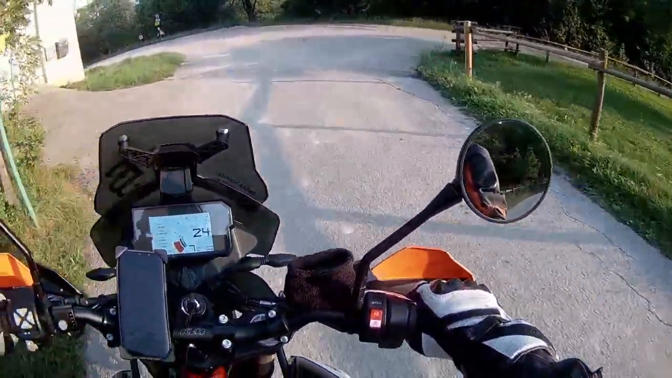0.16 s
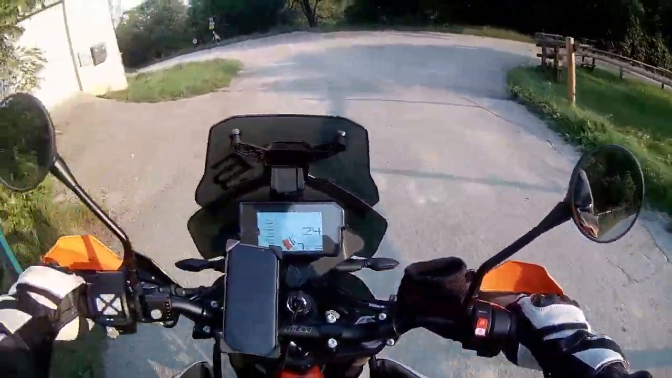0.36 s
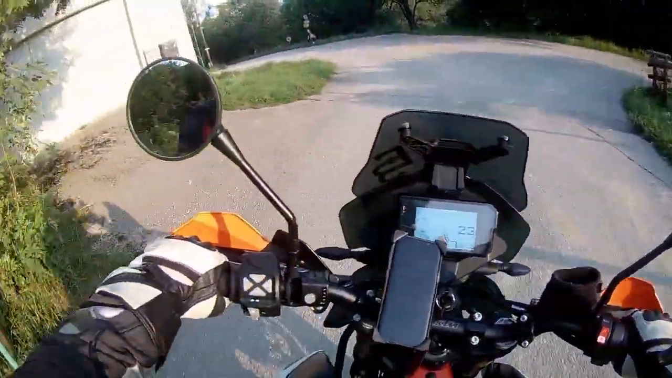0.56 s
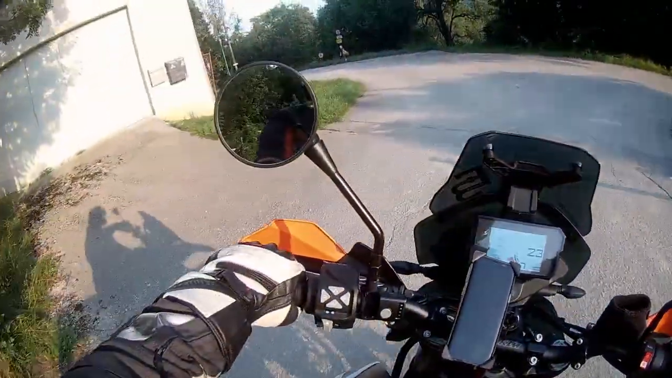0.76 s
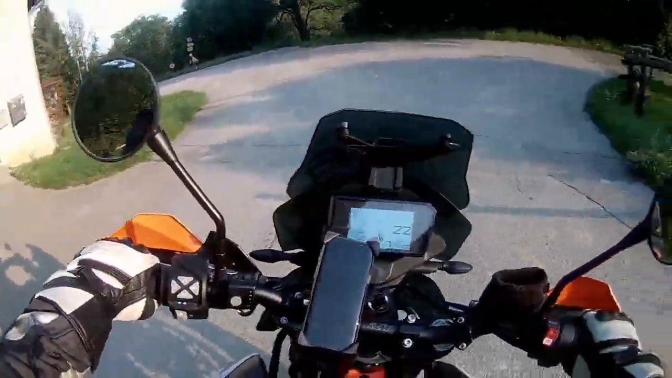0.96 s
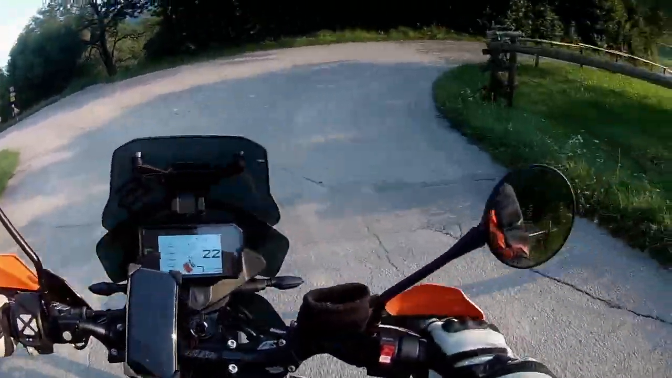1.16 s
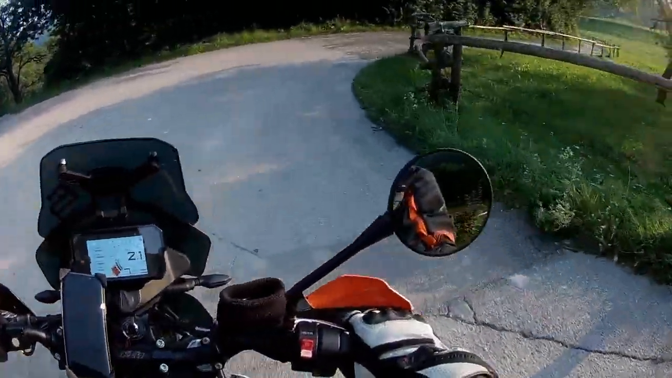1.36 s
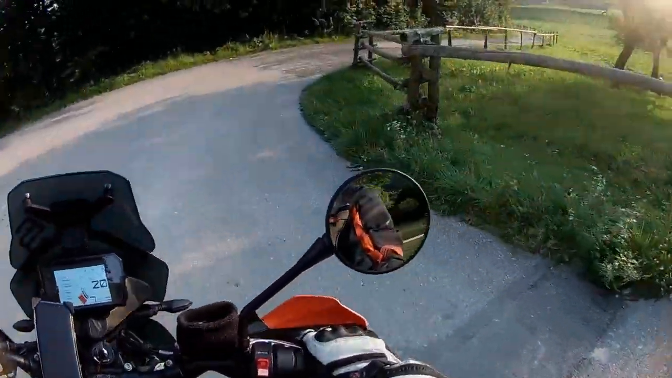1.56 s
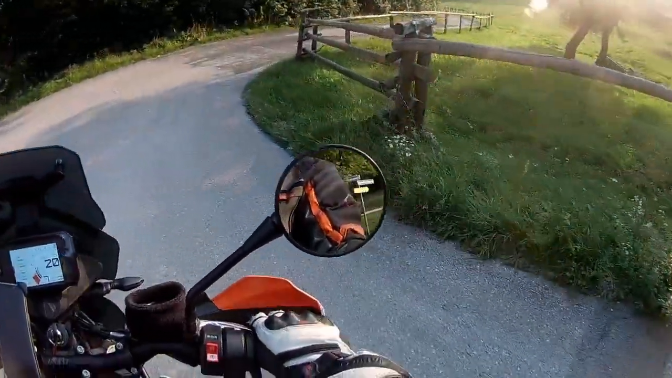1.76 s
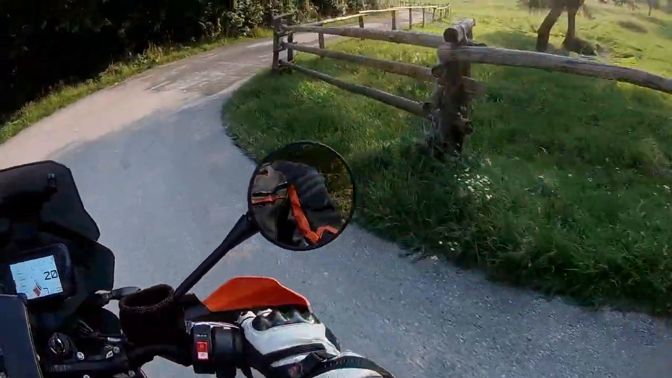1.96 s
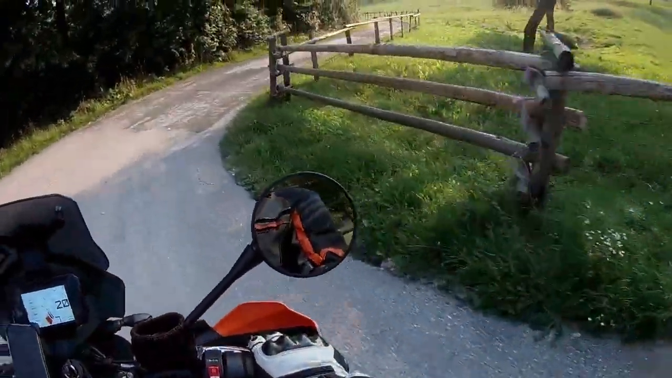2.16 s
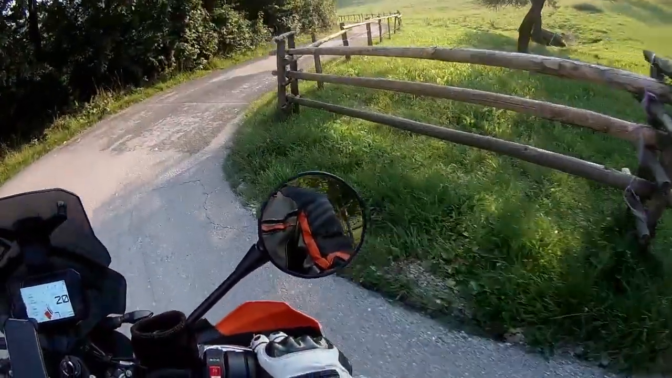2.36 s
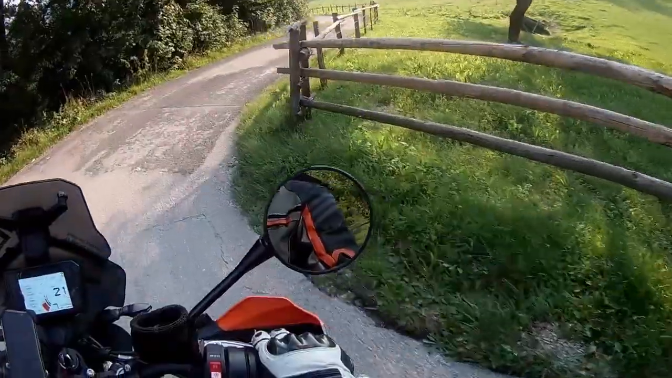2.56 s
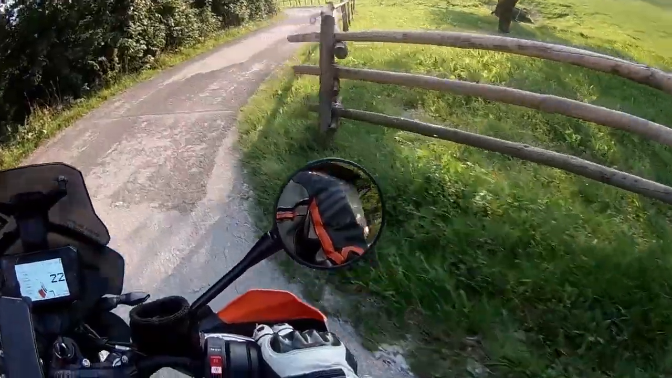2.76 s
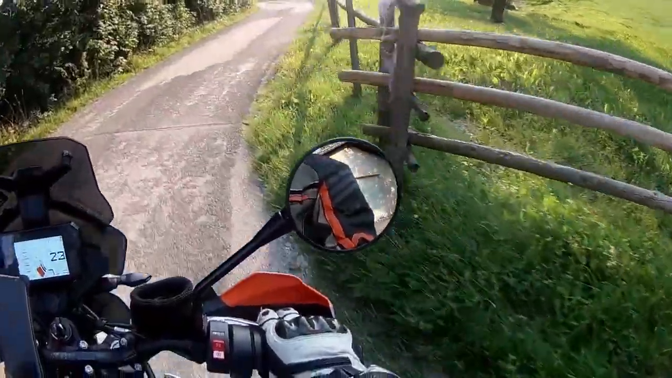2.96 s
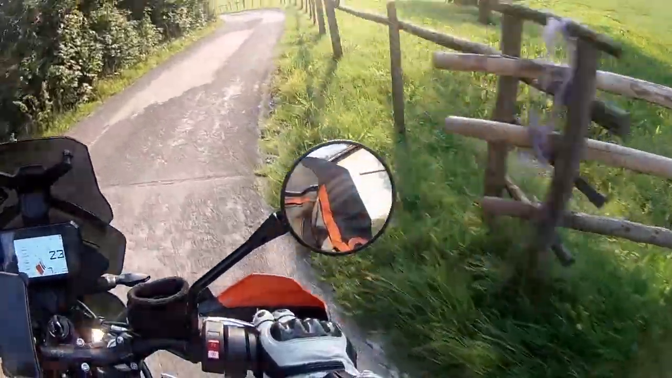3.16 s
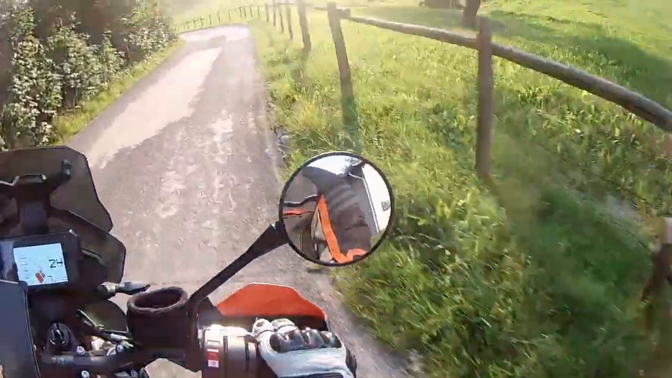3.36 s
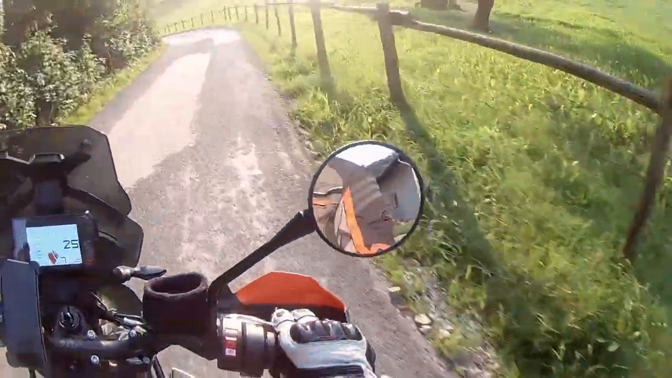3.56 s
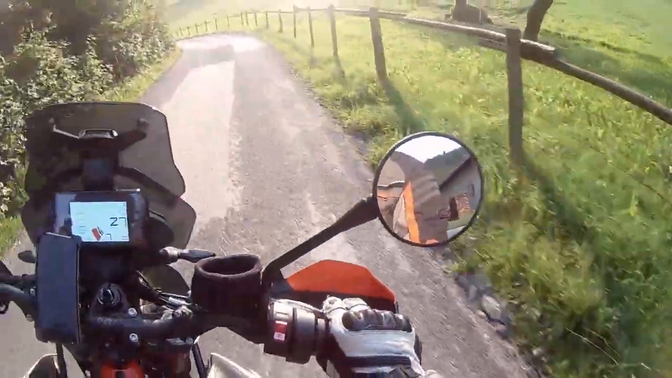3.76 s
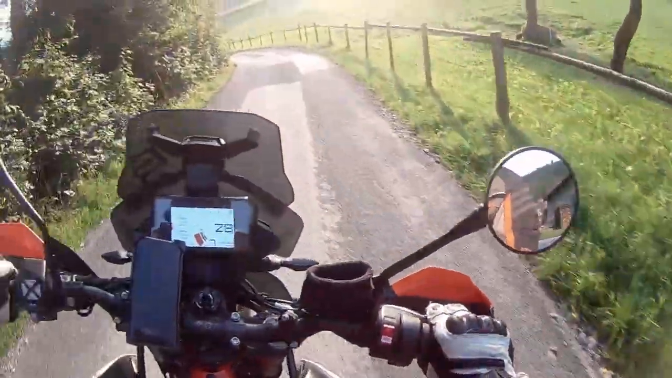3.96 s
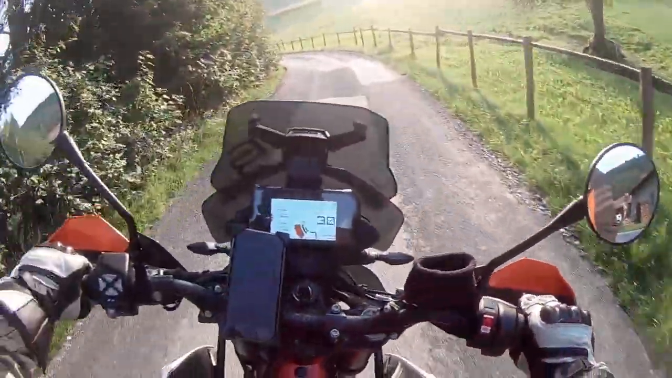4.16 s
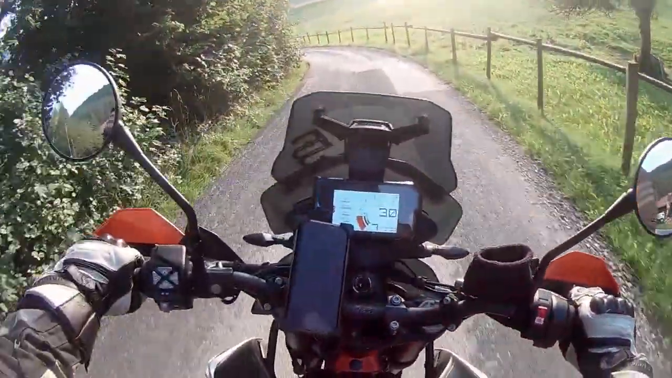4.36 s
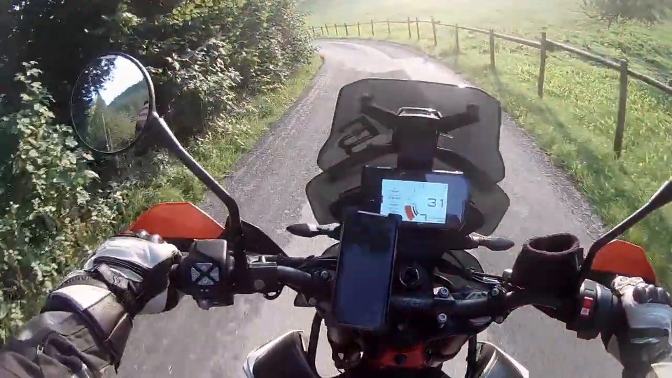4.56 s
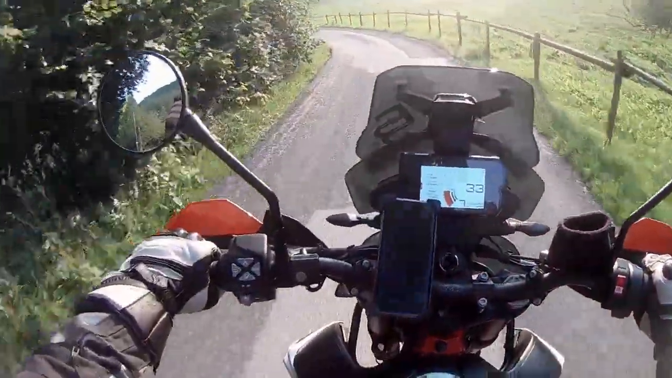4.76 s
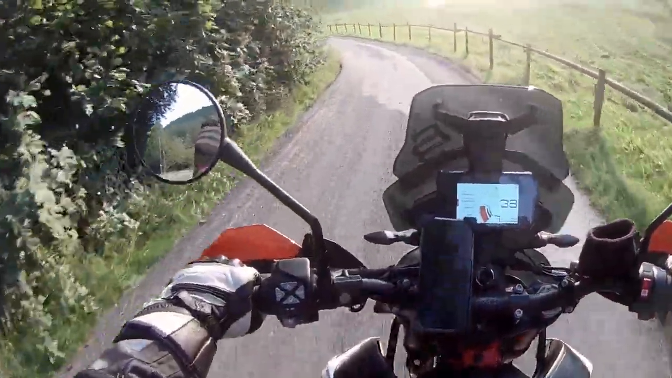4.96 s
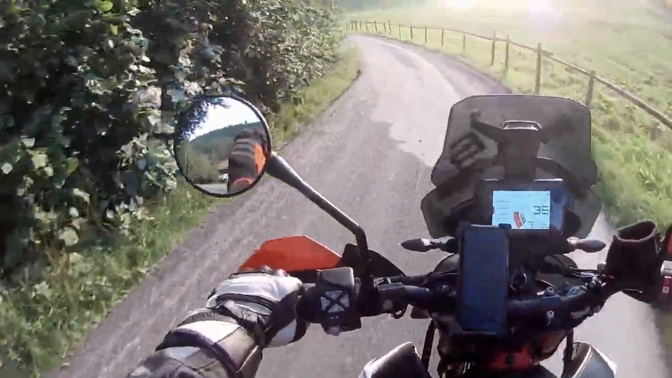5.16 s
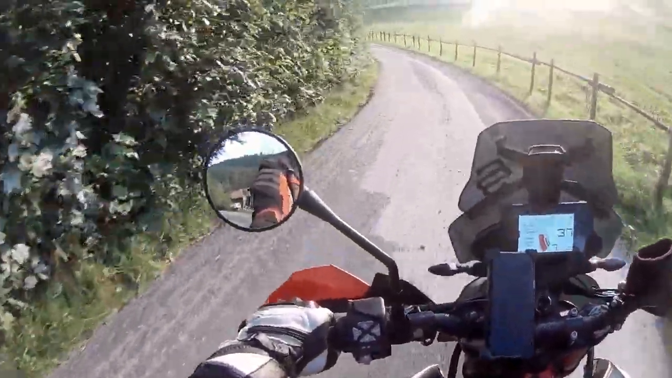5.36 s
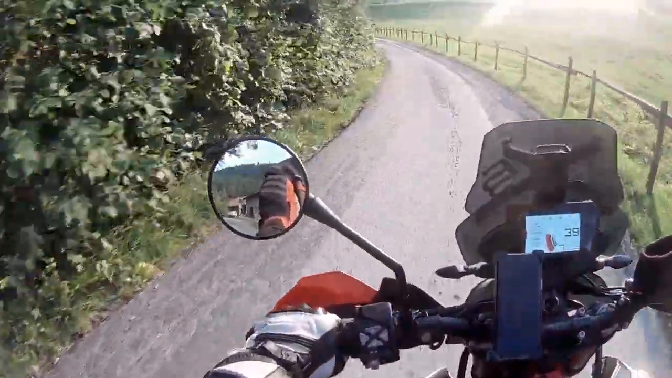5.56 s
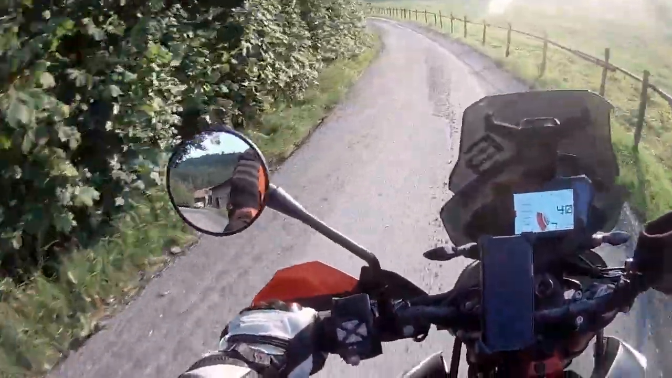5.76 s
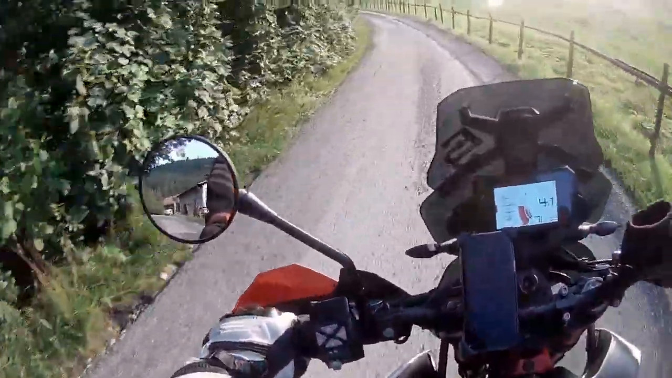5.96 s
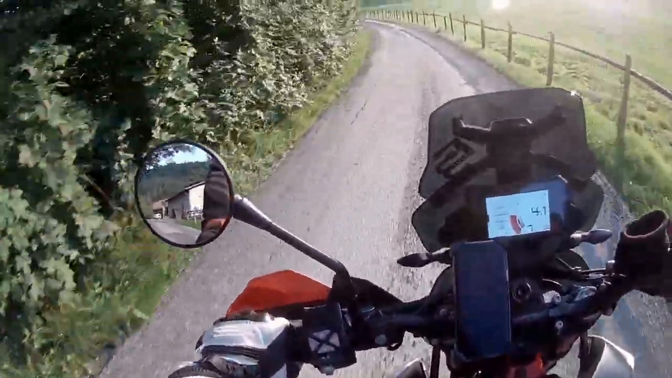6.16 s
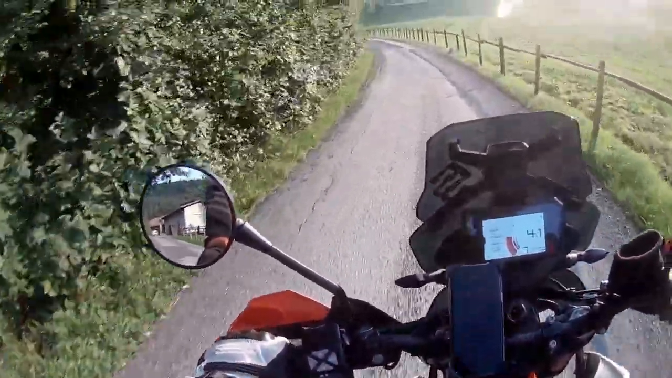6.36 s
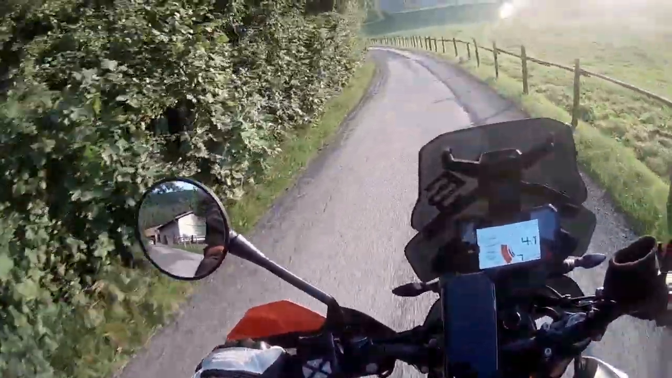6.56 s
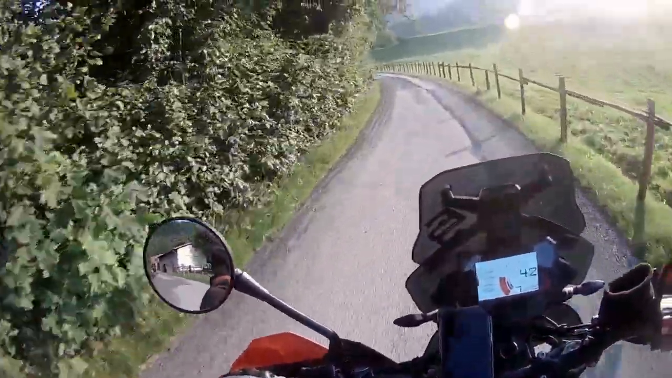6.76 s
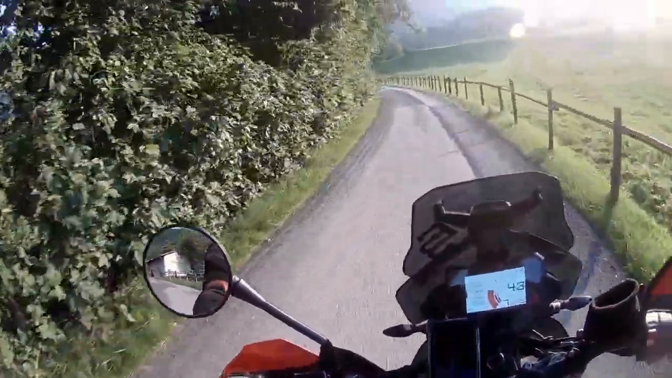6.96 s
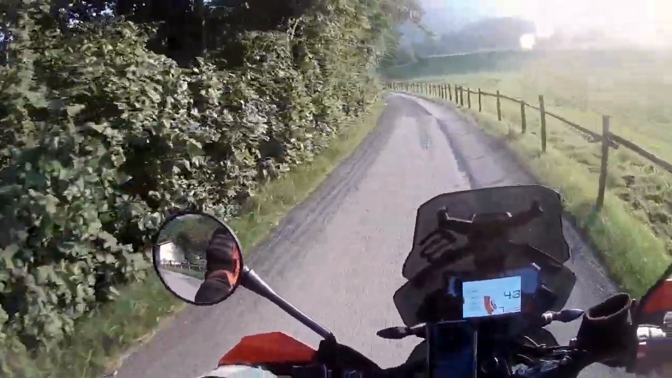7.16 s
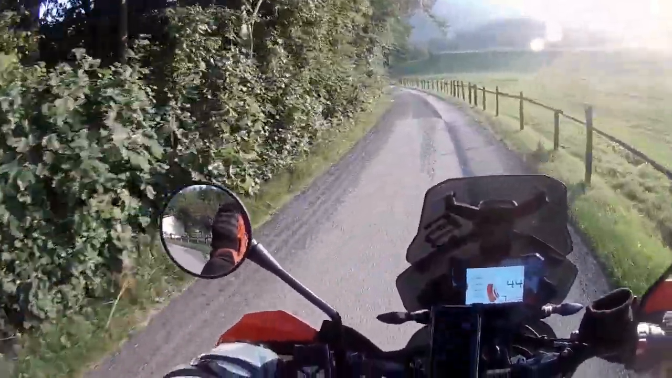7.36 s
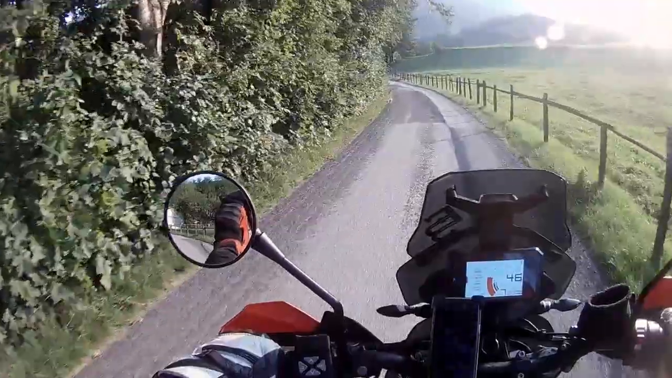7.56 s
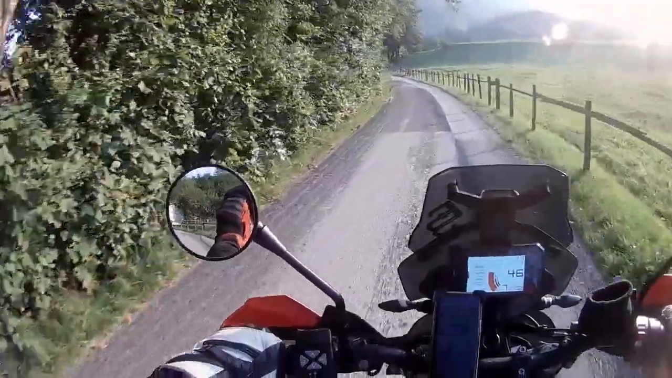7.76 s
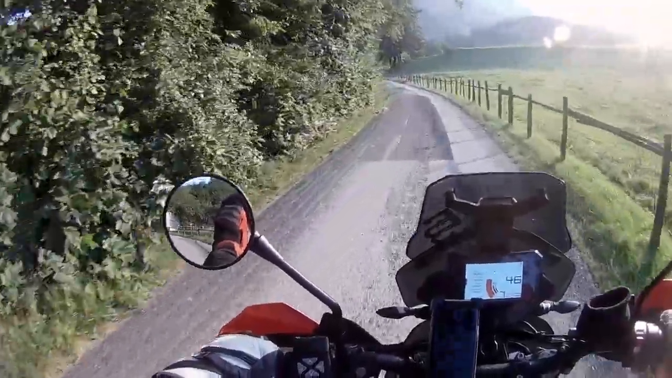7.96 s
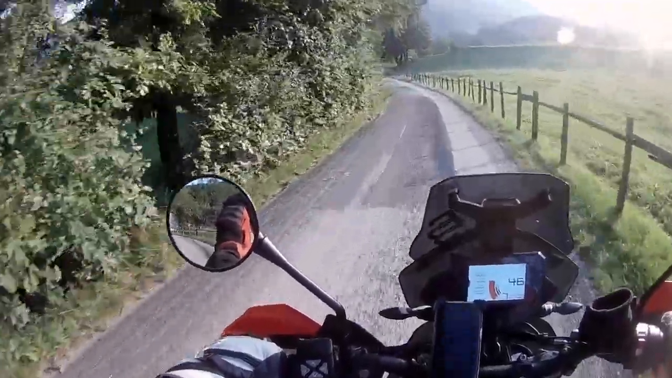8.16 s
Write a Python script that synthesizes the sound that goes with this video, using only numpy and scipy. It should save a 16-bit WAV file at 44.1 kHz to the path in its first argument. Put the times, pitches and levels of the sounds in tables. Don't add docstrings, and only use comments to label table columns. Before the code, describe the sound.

Outdoors, a muffled housed microphone on the rider picks up a lumpy twin engine dropping in speed, clattering and softly whining. After the bend it pulls hard, deep beats quickening into a rising growl. The throttle wavers, then closes; heavy wind thuds, hollow airy rushing and a smooth tread hum take over, with tiny instants of missing treble.

```python
import sys
import numpy as np
from scipy import signal
from scipy.fft import rfft, irfft, next_fast_len
from scipy.io import wavfile

SR = 44100
rng = np.random.default_rng(int(sys.argv[2]) if len(sys.argv) > 2 else 0)


def wav_record(signal):
    frames = np.transpose(np.atleast_2d(signal))
    bounded = np.clip(frames, -1, 1)
    quanta = np.round(bounded * 32767).astype(np.int16)
    wavfile.write(sys.argv[1], SR, quanta)


def ratio(d):
    e = np.asarray(d, float) / 20
    return 10 ** e


N = 366030
STEP = 40


def rms_one(x):
    return x / np.sqrt(np.mean(x ** 2) + 1e-20)


def in_time(rows):
    s, *columns = np.transpose(rows)
    return [np.interp(np.arange(N) / SR, s, c) for c in columns]


def smooth(coarse):
    return np.interp(np.arange(N) / STEP, np.arange(len(coarse)), coarse)


def drift(rate_hz):
    r = np.exp(-2 * np.pi * STEP * rate_hz / SR)
    white = rng.standard_normal(N // STEP + 2001)
    slow = signal.lfilter([1], [1, -2 * r, r * r], white)[2000:]
    return rms_one(slow - slow.mean())


def swells(events, size):
    t = np.arange(N // STEP + 1) * STEP / SR
    return smooth(sum(size(db) * np.exp(-((t - s) / half_s) ** 2) for s, db, half_s in events))


def resonance(x, hz, width_hz):
    r = np.exp(-np.pi * width_hz / SR)
    zeros = (1 - r * r) / 2 * np.array([1, 0, -1])
    poles = [1, -2 * r * np.cos(2 * np.pi * hz / SR), r * r]
    return signal.lfilter(zeros, poles, x + 1e-18)


def steep_resonance(x, hz, width_hz):
    return resonance(resonance(x, hz, width_hz), hz, width_hz)


def coloured(spectrum):
    hz, level_db = np.transpose(spectrum)
    size = next_fast_len(N)
    log_hz = np.log(np.arange(size // 2 + 1) * SR / size + 1e-3)
    gain = ratio(np.interp(log_hz, np.log(hz), level_db))
    return rms_one(irfft(rfft(rng.standard_normal(size)) * gain, size)[:N])


def ringing_noise(modes, gate, patchy_db):
    white = gate * rng.standard_normal((2, N))
    out = 0
    for k, (hz, width_hz, db) in enumerate(modes):
        level = smooth(ratio(db + patchy_db * drift(11.0)))
        out = out + level * steep_resonance(white[k % 2], hz, 1.55 * width_hz)
    return rms_one(out)


def smeared(turns, smear_hz, clean):
    low_pass = signal.butter(2, smear_hz / 2, fs=SR, output="sos")
    blur = signal.sosfilt(low_pass, rng.standard_normal((2, N)))
    flutter = clean + rms_one(blur[0]) + 1j * rms_one(blur[1])
    return rms_one(np.real(flutter * np.exp(2j * np.pi * turns)))


MID_SPEED_PER_S, FULL_LOAD_DB = 20, -26
# (time [s], four-stroke cycles [1/s], firing strength [dB])
CRANK = [(0, 16.7, -36), (.55, 15.9, -34), (1.0, 15.3, -38), (1.5, 14.5, -41), (2.0, 14.1, -38),
         (2.3, 14.4, -35), (2.6, 15.0, -31), (3.0, 16.2, -26.5), (3.5, 17.75, -25.5), (4.0, 20.05, -25.5),
         (4.5, 22.75, -26), (5.2, 26.7, -25.5), (5.4, 27.6, -28), (5.6, 28.0, -34), (6.0, 28.5, -29),
         (6.4, 29.1, -31), (6.8, 30.0, -39), (8.3, 32.7, -50)]


def speed_and_load():
    per_s, strength_db = in_time(CRANK)
    return per_s, 20 * np.log10(per_s / MID_SPEED_PER_S), strength_db - FULL_LOAD_DB


# (frequency [Hz], density [dB per Hz])
HISS = [(4410, -35), (7500, -5), (10600, -6.5), (15100, -4), (15700, -2.5)]


def hiss():
    return ratio(-61) * coloured(HISS)


# (frequency [Hz], density [dB per Hz])
ROAR = [(120, -13.5), (220, -0.5), (280, -3), (330, -5), (550, -3), (700, -7), (860, -13), (1000, -7.5),
        (2500, -21.5), (7500, -51)]
ROAR_DB, ROAR_DB_PER_SPEED_DB = -37, 1.79


def roar(speed_db):
    level_db = ROAR_DB + ROAR_DB_PER_SPEED_DB * speed_db + 0.4 * smooth(drift(12.0))
    return coloured(ROAR) * ratio(level_db)


# (time [s], level [dB])
AIRFLOW = [(0, -32.5), (.78, -34.5), (1.2, -32), (1.6, -35.5), (1.95, -38), (3.0, -38), (3.6, -32.5),
           (3.9, -30.5), (4.5, -26.5), (5.5, -28), (6.15, -24.5), (6.45, -24.5), (7.0, -23.5), (8.0, -23.5),
           (8.3, -23.5)]
# (frequency [Hz], width [Hz], level [dB])
HOUSING = [(1137, 153, -4), (1412, 150, -1.5), (1537, 58, 3), (1733, 72, -4), (2003, 253, -9.5),
           (2173, 110, -18), (2840, 380, -18.5), (3640, 230, -25), (3998, 90, -19), (4565, 300, -28.5),
           (5960, 230, -30.5), (6970, 200, -39)]


def rush():
    rush_db, = in_time(AIRFLOW)
    turbulence = smooth(ratio(0.96 * drift(37)))
    return ratio(rush_db - 0.6) * ringing_noise(HOUSING, turbulence, patchy_db=0.3)


# (time [s], level [dB], half length [s])
BUMPS = [(.44, -35.5, 0.081), (.7, -34, 0.063), (1.27, -24, 0.2), (2.14, -22, 0.13), (3.55, -29, .07),
         (3.92, -17, 0.17), (4.7, -25, 0.12), (5.2, -18, 0.06), (5.55, -14, 0.1), (5.83, -14, 0.076),
         (6.2, -14.5, 0.078), (6.55, -20, .1), (6.84, -29, 0.042), (6.96, -21, 0.044), (7.55, -26, 0.087),
         (7.71, -26, .05), (7.95, -11, 0.064), (8.21, -27, .04)]
IDLE_SHAKE_DB, SHAKE_HZ, SHAKE_WIDTH_HZ = -37.5, 26.3, 6.3


def shake():
    swing = smeared(SHAKE_HZ * np.arange(N) / SR, SHAKE_WIDTH_HZ, clean=1.5)
    return ratio(-6.5) * (ratio(IDLE_SHAKE_DB) + swells(BUMPS, size=ratio)) * swing


# (time [s], change [dB], half length [s])
GUSTS = [(0.0, 5.5, 0.055), (.46, -1, 0.046), (.67, 7, 0.041), (.8, -1, .1), (1.3, 1.5, .08),
         (1.85, 7.5, 0.28), (2.2, 5, 0.1), (3.2, 0, 0.14), (4.79, 1, .08), (5.26, 1, 0.044),
         (5.55, 3.5, 0.19), (6.27, 2.5, .06), (6.01, 4, 0.047), (6.15, 2.5, 0.051), (6.7, 1, 0.039),
         (6.89, 2, 0.044), (7.12, -6, 0.052), (7.42, -6.5, 0.038), (7.49, 2.5, 0.026), (7.65, 3.5, 0.084),
         (7.79, 2.5, 0.029), (8.21, -2, 0.044)]
# (frequency [Hz], density [dB per Hz])
BUFFET = [(12, -20.5), (22, 1.5), (55, -2), (85, -2.5), (160, -13.5), (250, -21), (400, -34.5), (700, -78)]
BREEZE_DB, BUFFET_DB, BUFFET_DB_PER_SPEED_DB = -40.5, -39, 4.49


def buffet(speed_db):
    pressure = np.hypot(ratio(BREEZE_DB), ratio(BUFFET_DB + BUFFET_DB_PER_SPEED_DB * speed_db))
    lumps = ratio(2.0 + 1.8 * smooth(drift(46)))
    return pressure * ratio(swells(GUSTS, size=float)) * lumps * coloured(BUFFET)


def wind():
    speed_db = speed_and_load()[1]
    return buffet(speed_db) + shake() + rush() + roar(speed_db)


# (time [s], level [dB], frequency [Hz])
TICK = [
    (1.825, -49, 3800),
]


def grit():
    t = np.arange(N) / SR
    out = 0
    for s, db, hz in TICK:
        ringing = rms_one(steep_resonance(rng.standard_normal(N), hz, 400))
        out = out + ratio(db) * np.exp(-((t - s) / .012) ** 2) * ringing
    return out


# (multiple of block rate [1], level [dB])
TREAD_TONES = [(1, 0), (2.05, -6), (3.96, 4.5)]
BLOCKS_PER_CYCLE = 8.6
TREAD_DB, SMOOTH_ROAD_S, TREAD_RISE_S = -38.5, 6.8, .12


def tyres():
    turns = BLOCKS_PER_CYCLE * np.cumsum(speed_and_load()[0]) / SR
    onset = (1 + np.tanh((np.arange(N) / SR - SMOOTH_ROAD_S) / TREAD_RISE_S / 2)) / 2
    hum = sum(ratio(db) * smeared(k * turns, 9 * k, clean=1.5) for k, db in TREAD_TONES)
    return ratio(TREAD_DB) * onset * hum


SECOND_FIRING = 285 / 720


def firing_gate(cycles, depth, fade):
    return 1 + depth * sum(np.exp(-((cycles - offset) % 1) / fade) for offset in (0, SECOND_FIRING))


# (teeth per cycle [1], smear [Hz], level [dB])
MESH = [(155.4, 210, -7), (166.6, 220, -11.5), (80.94, 107, -7), (226.0, 420, -15.5)]
# (frequency [Hz], width [Hz], level [dB])
COVERS = [(2120, 310, 2), (1145, 150, 1.5), (1495, 124, 9), (1890, 165, 10), (3020, 110, -3.5),
          (3480, 73, 4), (3990, 124, -1), (4400, 220, -2)]
WHINE_DB, WHINE_DB_PER_LOAD_DB, WHINE_DB_PER_SPEED_DB = -38.5, 1, -0.1
OVERRUN_DB, OVERRUN_FADE_S = -39, 0.99


def whine(cycles, gate, speed_db, load_db):
    mesh = gate * sum(ratio(db) * smeared(teeth * cycles, smear_hz, clean=.15)
                      for teeth, smear_hz, db in MESH)
    covers = sum(ratio(db) * resonance(mesh, hz, width_hz) * (-1) ** k
                 for k, (hz, width_hz, db) in enumerate(COVERS))
    overrun = ratio(OVERRUN_DB) * np.exp(-np.arange(N) / SR / OVERRUN_FADE_S)
    driven = ratio(WHINE_DB + WHINE_DB_PER_LOAD_DB * load_db + WHINE_DB_PER_SPEED_DB * speed_db)
    return (overrun + driven) * (0.076 * mesh + covers)


# (frequency [Hz], width [Hz], level [dB])
CASES = [(253.5, 46, -2), (563, 38, -2), (1147, 72, 0), (1363, 29, -10.5), (1519, 160, -3.5), (1899, 90, 3),
         (2402, 120, -11.5), (2956, 56, -24.5), (3315, 76, -17), (3810, 57, -17), (4367, 290, -19.5),
         (5730, 240, -31), (6560, 400, -32.5)]
RATTLE_DB, RATTLE_DB_PER_LOAD_DB, RATTLE_DB_PER_SPEED_DB = -33, 0.21, 0.53


def rattle(gate, speed_db, load_db):
    level_db = RATTLE_DB + RATTLE_DB_PER_LOAD_DB * load_db + RATTLE_DB_PER_SPEED_DB * speed_db
    return ratio(level_db) * ringing_noise(CASES, gate, patchy_db=-1.2)


# (frequency [Hz], width [Hz], level [dB])
KNOCK = [(265, 50, 8.5), (530, 15, -5.5), (1210, 110, -22), (1910, 310, 4)]


def knock(cycles, uneven_db, second_db):
    pulses = np.zeros(N)
    for offset, level_db in ((0, 0), (SECOND_FIRING, second_db)):
        at = np.flatnonzero(np.diff(np.floor(cycles - offset)))
        chance = rng.standard_normal((400, 2))[:len(at)]
        jitter = (25 * chance[:, 1]).astype(int)
        pulses[np.clip(at + jitter, 0, N - 1)] = ratio(level_db + uneven_db * chance[:, 0])
    return rms_one(sum(ratio(db) * steep_resonance(pulses, hz, 1.6 * width_hz) for hz, width_hz, db in KNOCK))


# (multiple of the cycle [1], level [dB])
ORDERS_DB = [(2, -9), (3, -17), (4, -14), (5, 0), (6, -9), (7, -8), (8, -6), (9, -18), (10, -10), (11, -24),
             (12, -23), (18, -28)]
# (frequency [Hz], gain [dB])
PIPE = [(25, -2), (50, -6), (70, -4), (90, 0), (125, -8), (165, -12.5), (222, -10), (262, 7), (295, 0),
        (330, -5), (365, 7), (420, -4), (500, 0), (570, 11), (620, -2)]


def exhaust(per_s, cycles, uneven_db):
    pipe_hz, pipe_db = np.transpose(PIPE)
    out = 0
    for k, db in ORDERS_DB:
        phase = np.angle(1 + 0.83 * np.exp(-2j * np.pi * k * SECOND_FIRING))
        phase -= .12 * k ** 2
        gain_db = np.interp(np.log(k * per_s[::STEP]), np.log(pipe_hz), pipe_db)
        level = smooth(ratio(db + gain_db + uneven_db * drift(2.6)))
        out = out + np.sqrt(2) * level * np.cos(2 * np.pi * k * cycles + phase)
    return out


def engine():
    per_s, speed_db, load_db = speed_and_load()
    cycles = np.cumsum(per_s) / SR + .3
    gate = firing_gate(cycles, depth=1.05, fade=0.13)
    firing = exhaust(per_s, cycles, uneven_db=0.2)
    firing = firing + ratio(-17.5) * knock(cycles, uneven_db=-2.0, second_db=-3)
    mechanics = rattle(gate, speed_db, load_db) + whine(cycles, gate, speed_db, load_db)
    return ratio(FULL_LOAD_DB + load_db) * firing + mechanics


MIC_TOP_HZ = 7050


def scene():
    membrane = signal.butter(4, MIC_TOP_HZ, fs=SR, output="sos")
    dulled = signal.sosfilt(membrane, wind() + grit() + tyres() + engine())
    return (dulled + hiss())[None]


# (time [s], length [slots], lost above [Hz], spared band [Hz])
STARVED = [(1.28, 1, 5000, 0), (2.474, 1, 4900, 0), (3.114, 1, 5200, 5), (3.413, 1, 4900, 0),
           (3.518, 1, 4900, 0), (3.604, 1, 5100, 6300), (3.711, 1, 5100, 0), (3.754, 1, 5100, 2),
           (5.813, 2, 4850, 5800), (6.07, 2, 4900, 6195), (6.01, 1, 8640, 14800), (6.143, 1, 5000, 5800),
           (6.292, 1, 5100, 0), (6.442, 1, 5000, 6003), (6.612, 1, 5100, 6000), (6.826, 1, 4200, 6000),
           (7.04, 1, 5000, 6004), (7.145, 1, 4970, 6000), (7.19, 1, 5000, 6000), (7.317, 1, 6200, 0),
           (7.551, 1, 5260, 0)]
# (frequency [Hz], half width [Hz])
HOLES = [(2450, 120), (3050, 60), (3650, 100), (4400, 180)]
SLOT_S = 1024 / 48000


def dropouts(x):
    out, half = x.copy(), 2048
    hz, t = np.fft.rfftfreq(2 * half, 1 / SR), np.arange(-half, half) / SR
    for s, slots, edge_hz, spared_hz in STARVED:
        span = slice(round(s * SR) - half, round(s * SR) + half)
        empty = (hz > edge_hz) & (abs(hz - spared_hz) > 130)
        if slots > 1.5:
            empty |= np.any([abs(hz - hole_hz) < half_hz for hole_hz, half_hz in HOLES], axis=0)
        lost = irfft(rfft(out[0, span]) * empty)
        reach = np.clip(abs(t) / SLOT_S - (round(slots) - 1) / 2, 0, 1)
        out[0, span] -= lost * (1 - np.sin(np.pi / 2 * reach))
    return out


def band_limit(x):
    return signal.sosfilt(signal.butter(12, 15900, fs=SR, output="sos"), x)


def record(dry):
    cut = signal.sosfilt(signal.butter(2, 14, "high", fs=SR, output="sos"), dry)
    mix = dropouts(cut)
    return band_limit(mix)


dry = scene()
out = record(dry)
wav_record(out)
```